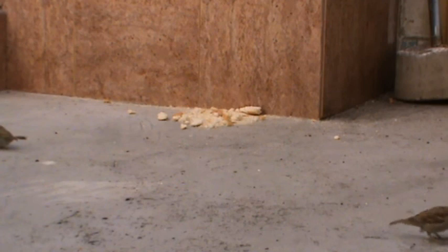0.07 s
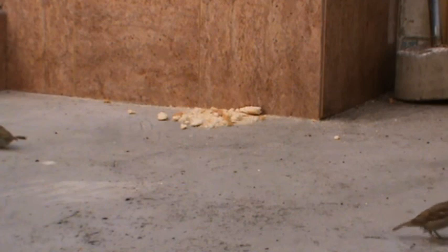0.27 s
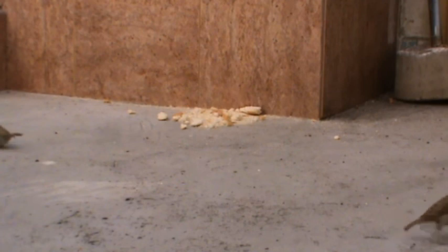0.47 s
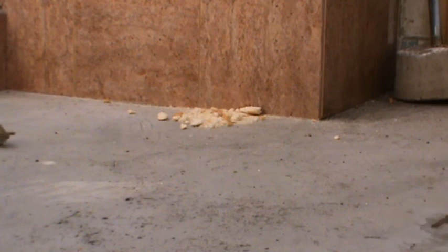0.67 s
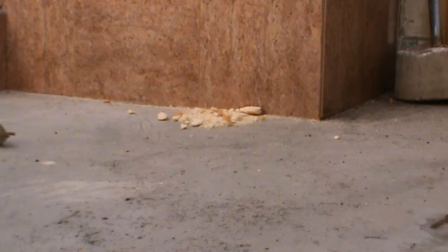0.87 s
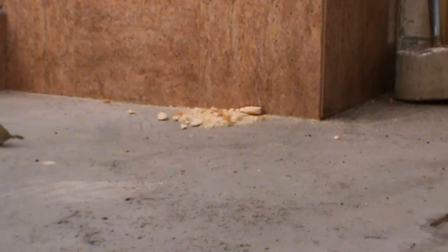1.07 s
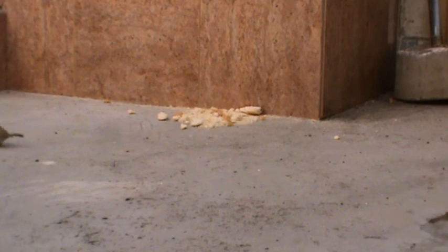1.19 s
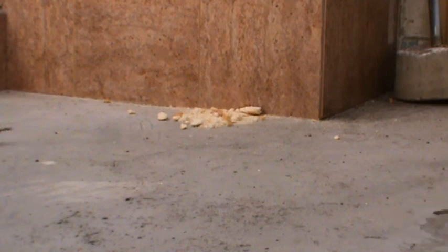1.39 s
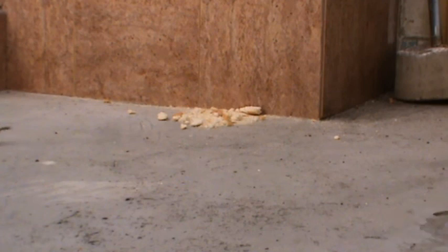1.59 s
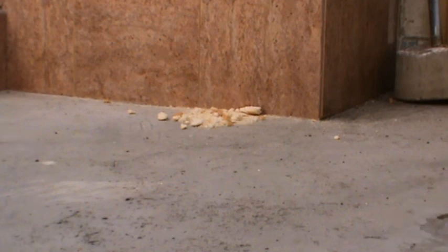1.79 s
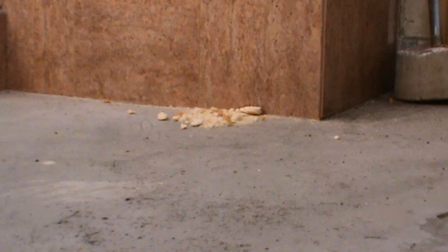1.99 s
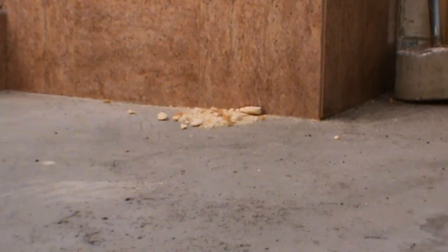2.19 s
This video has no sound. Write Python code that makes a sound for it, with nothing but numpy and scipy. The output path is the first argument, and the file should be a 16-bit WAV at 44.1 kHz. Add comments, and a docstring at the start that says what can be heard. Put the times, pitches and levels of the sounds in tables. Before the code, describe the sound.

Sparrows chirp on a walled patio, slightly left, with a brief echo. Two short rough notes open, then a loud, warbling cheep falls in pitch from 0.2 to 0.3 seconds. Faint foot scuffs and beak ticks follow around 0.5. Four quick raspy chirps run from 1.0 to 1.35, then a sharper peck on concrete at 1.5 with light shuffling. Faint distant rumble and hiss continue underneath until just past 2 seconds.

```python
"""Sparrows on a walled patio

One sparrow gives runs of short, rough chatter notes; another whistles a loud falling cheep.
Beaks tap and feet shuffle on the concrete floor, and the hard walls ring briefly.
A bed of distant rumble and microphone hiss lies underneath."""
import sys
import numpy as np
from scipy import signal
from scipy.fft import rfft, irfft
from scipy.io import wavfile

SR = 44100
rng = np.random.default_rng(int(sys.argv[2]) if len(sys.argv) > 2 else 0)


def master(y):
    """Save y as 16-bit WAV."""
    cut = np.clip(np.atleast_2d(y).T, -1, 1)
    pcm = np.round(cut * 32767)  # scale
    wavfile.write(sys.argv[1], SR, pcm.astype(np.int16))


N = 99225


def amp(db):
    return 10 ** (np.asarray(db) / 20)


def unit_rms(x):
    return x / np.sqrt(np.mean(x ** 2) + 1e-20)


def at_hz(curve, hz):
    """Read a curve along a log-frequency axis."""
    curve_hz, values = np.transpose(curve)
    return np.interp(np.log(hz), np.log(curve_hz), values)


def bandpass(x, low_hz, high_hz):
    sos = signal.butter(2, [low_hz, min(high_hz, SR / 2.2)], "band", fs=SR, output="sos")
    return signal.sosfilt(sos, x)


def drift(rate_hz, size):
    """Smooth random modulator, rms 1."""
    pole = np.exp(-2 * np.pi * rate_hz / SR)
    smooth = signal.lfilter([1], [1, -2 * pole, pole * pole], rng.standard_normal(size + SR))
    return unit_rms(smooth[SR:])


def coloured_noise(eq, size):
    """Noise through an EQ curve, rms 1."""
    white = rfft(rng.standard_normal(size))
    hz = np.arange(1, len(white) + 1) * SR / size
    return unit_rms(irfft(white * amp(at_hz(eq, hz)), size))


# Tone of the bed: (frequency [Hz], relative density [dB])
BED_EQ = [(20, -16), (32, -4), (49, 2.5), (62, -21.5), (90, -7.5), (125, -16), (152, -12), (220, -20),
          (460, -23), (1000, -25), (2000, -29.5), (4500, -35.5), (9000, -40), (12500, -38.5), (15300, -41)]
# Stereo width of the bed: (frequency [Hz], side minus mid [dB])
BED_WIDTH = [(60, -39), (110, -27.5), (200, -15.5), (380, -7), (690, -5), (1280, -1.5), (2360, -2.5),
             (4360, -4), (8040, -2.5), (14800, -24)]
# Fader ride on the rumble: (time [s], relative level [dB])
RUMBLE_RIDE = [(0.0, -61), (0.4, -62), (0.42, -55), (0.85, -62), (2.17, -56), (2.25, -56.5)]


def rumble_and_hiss(level_db=-53.5, crossover_hz=60):
    """A noise bed: distant rumble swells slowly under steady, wider microphone hiss."""
    hz = np.arange(1, N // 2 + 2) * SR / N
    low_cut_db = -200 * (hz < 15)
    mid, side = rfft(rng.standard_normal((2, N))) * amp(at_hz(BED_EQ, hz) + low_cut_db)
    stereo = mid + amp(at_hz(BED_WIDTH, hz)) * side * [[1], [-1]]
    times, ride_db = np.transpose(RUMBLE_RIDE)
    swell = amp(np.interp(np.arange(N) / SR, times, ride_db - ride_db.mean()))
    rumble = swell * irfft(stereo * (hz < crossover_hz), N)
    hiss = irfft(stereo * (hz >= crossover_hz), N)
    return amp(level_db) * unit_rms(rumble + hiss)


# Reverb decay: (frequency [Hz], time to fall 60 dB [s])
WALL_DECAY = [(500, 0.26), (2000, 0.37), (4000, .3), (8000, 0.24), (14000, 0.05)]
# Reverb tone: (frequency [Hz], gain [dB])
WALL_EQ = [(500, 5.2), (2000, 5.1), (4000, -1.1), (8000, 2.5), (14000, 7)]


def wall_reverb(send, return_db=1.5, predelay_s=.0013, side_db=-10):
    """Echoes off hard walls: a short stereo noise tail that dies away band by band."""
    age = np.arange(SR // 2) / SR
    edges_hz = 150 * 2 ** np.arange(0, 7.1, .5)
    white = rng.standard_normal((2, 2, len(age)))
    tail = np.zeros((2, len(age)))
    for k, (low, high) in enumerate(zip(edges_hz, edges_hz[1:])):
        centre = np.sqrt(low * high)
        decay = amp(at_hz(WALL_EQ, centre) - 60 * age / at_hz(WALL_DECAY, centre))
        tail += bandpass(white[k % 2], low, high) * decay
    impulse = tail * (age > predelay_s) / np.sqrt(SR / 50)
    mid, side = signal.fftconvolve(send[None], impulse, axes=1)[:, :len(send)]
    return amp(return_db) * (mid + amp(side_db) * side * [[1], [-1]])


# Foot scuffs: (start [s], length [s], level [dB], low cut [Hz], high cut [Hz])
SCUFFS = [(.3, 0.32, -69.5, 430, 650), (0.44, 0.061, -62.5, 310, 5000), (0.489, .13, -62, 300.5, 1470),
          (0.522, 0.094, -65.5, 3000, 13600), (0.834, .05, -69, 4060, 5240), (1.02, 0.052, -59, 810, 2980),
          (1.363, 0.029, -54.5, 252, 580), (1.335, 0.044, -58.5, 990, 1540), (1.497, 0.033, -55, 307, 1210),
          (1.607, 0.036, -61, 1290, 2250), (1.61, 0.057, -59.5, 2500, 5650)]


def foot_shuffles(t, grains_per_s=6000):
    """Feet scuff the concrete: dense uneven grains with a quick swell and a slower fade."""
    grains = rng.standard_normal(len(t)) * rng.exponential(1, len(t))
    grains *= rng.random(len(t)) < grains_per_s / SR
    out = np.zeros(len(t))
    for start, length, db, low_hz, high_hz in SCUFFS:
        progress = np.clip((t - start) / length, 0, 1)
        envelope = np.sin(np.pi * progress ** .53)
        out += amp(db) * envelope * unit_rms(bandpass(grains, low_hz, high_hz))
    return out


# Beak hits: (time [s], click level before filtering [dB], ring [Hz])
BEAK_HITS = [(0.527, -37.5, 4440), (.54, -46, 6370), (.838, -49, 4900), (1.4961, -34.5, 5850),
             (1.4975, -32.5, 3870), (1.503, -24.5, 3280), (1.513, -47, 3400)]


def beak_taps(t, ring_spread=1.15, knock_hz=1400, ring_gain=8, knock_gain=1.589):
    """A beak strikes the floor: a click excites a narrow ring and a broader, duller knock."""
    out = np.zeros(len(t))
    for time, db, ring_hz in BEAK_HITS:
        click = 1e-18 + amp(db) * (np.arange(len(t)) == np.searchsorted(t, time))
        out += ring_gain * bandpass(click, ring_hz / ring_spread, ring_hz * ring_spread)
        out += knock_gain * bandpass(click, knock_hz / 2, knock_hz * 2)
    return out


# Chatter notes: (start [s], gain [dB], length [s], top pitch [Hz], tilt [dB/octave])
CHATTER_NOTES = [(-.035, -35.5, 0.041, 2148, 0.1), (0.069, -34, 0.039, 2050, 0.1),
                 (1.013, -43.5, .025, 1878, -3), (1.096, -30, 0.043, 2150, 1.5),
                 (1.204, -26, 0.031, 2188, 2.5), (1.302, -29, 0.038, 2300, 1.8)]
# Throat resonances: (frequency [Hz], gain [dB])
THROAT_EQ = [(800, -34.5), (1300, -21), (2100, -21.5), (2900, -11), (3400, -10.5), (3750, -4), (4200, -3.5),
             (5000, -7.5), (6500, -18), (8000, -31), (11500, -33.5), (15000, -53.5)]
# Harmonics ahead of the throat, fundamental first: (level [dB])
CHATTER_HARMONICS = [7, 5, -6, -7, -5, -5]


def sparrow_chatter(t, attack_s=.018, release_s=.003, tilt_pivot_hz=3800):
    """Each note starts as throat rasp; part way, an unsteady voice glides up as the rasp fades."""
    glide_from, jitter = .52, .013  # shares of the pitch
    voice_entry, crossfade = .52, .08  # shares of the note
    voice_shimmer_db, rasp_shimmer_db, rasp_db, end_fade_db = 3, 2, -4, -5.5
    out = np.zeros(len(t))
    wobble = 1 + jitter * drift(300, len(t))
    shimmers = np.array([drift(450, len(t)) for _ in range(4)])
    for start, db, length, top_hz, tilt in CHATTER_NOTES:
        throat = [(hz, gain + tilt * np.log2(hz / tilt_pivot_hz)) for hz, gain in THROAT_EQ]
        on = (t > start) & (t < start + length + 8 * release_s)
        age, shimmer = t[on] - start, shimmers[:, on]
        progress = np.minimum(age / length, 1)
        pitch_hz = top_hz * (glide_from + (1 - glide_from) * progress)
        phase = 2 * np.pi * np.cumsum(pitch_hz * wobble[on]) / SR
        voice = np.zeros(len(age))
        for k, harmonic_db in enumerate(CHATTER_HARMONICS, 1):
            shaped_db = harmonic_db + at_hz(throat, k * pitch_hz)
            voice += amp(shaped_db + voice_shimmer_db * shimmer[k % 3]) * np.sin(k * phase)
        rasp = amp(rasp_db + rasp_shimmer_db * shimmer[3]) * coloured_noise(throat, len(age))
        voicing = 1 / (1 + np.exp((voice_entry - progress) / crossfade))
        attack = np.minimum(age / attack_s, 1)
        release = np.exp(-np.maximum(age - length, 0) / release_s)
        envelope = attack * release * amp(db + end_fade_db * progress ** 3)
        out[on] += envelope * (voicing * voice + (1 - .75 * voicing) * rasp)
    return out


# Cheep contour, with a quiet raspy lead-in: (time [s], pitch [Hz], whistle [dB], rasp [dB])
CHEEP_CONTOUR = [(0.168, 4150, -65.5, -52.5), (0.189, 4260, -38.5, -47), (.203, 4170, -43.5, -33),
                 (0.209, 3700, -43, -44.5), (0.214, 3730, -22.5, -40), (.219, 3855, -18, -51.5),
                 (.228, 4193, -22, -40.5), (0.237, 3706, -26.5, -49), (.244, 3905, -19, -46),
                 (0.255, 3450, -26, -40), (.272, 3155, -27.5, -49), (0.286, 2713, -28, -42.5),
                 (0.306, 2528, -48, -52.5), (0.318, 2270, -51.5, -62), (.33, 2200, -60, -70)]
# Whistle harmonics, fundamental first: (relative level [dB])
CHEEP_HARMONICS = [0, -25, -28, -36]
# Tone of the rasp: (frequency [Hz], relative density [dB])
CHEEP_RASP_EQ = [(1800, -28), (3000, -14), (4600, -4), (5400, 0), (6800, -9), (8000, -18), (9700, -27),
                 (12500, -22), (15000, -34)]


def sparrow_cheep(t, warble_start_s=.23, warble_hz=89.55, vibrato_hz=179.6, tremolo_db=2.5):
    """A near-pure whistle starts clean, then warbles unevenly as it falls; bright rasp rides on it."""
    times, contour_hz, whistle_db, rasp_db = np.transpose(CHEEP_CONTOUR)
    warble = np.sin(2 * np.pi * warble_hz * (t - warble_start_s)) + .5 * drift(150, len(t))
    warble *= t > warble_start_s
    pitch_hz = np.interp(t, times, contour_hz) + vibrato_hz * warble
    phase = 2 * np.pi * np.cumsum(pitch_hz) / SR
    whistle = np.zeros(len(t))
    for k, harmonic_db in enumerate(CHEEP_HARMONICS, 1):
        flicker_db = 2.5 * (k > 1) * drift(120, len(t))  # overtones only
        whistle += amp(harmonic_db + flicker_db) * np.sin(k * phase)
    whistle *= amp(np.interp(t, times, whistle_db) + tremolo_db * warble)
    rasp = amp(np.interp(t, times, rasp_db)) * coloured_noise(CHEEP_RASP_EQ, len(t))
    gate = (t > times[0]) & (t < times[-1])
    return (whistle + rasp) * gate


def scene(chatter_pan_db=2.3, cheep_pan_db=3, floor_send_db=-2.5):
    """Mix both birds a little left and the floor sounds centred, over the reverb and the bed."""
    t = np.arange(-SR // 10, N) / SR  # 0.1 s of pre-roll
    chatter, cheep = sparrow_chatter(t), sparrow_cheep(t)
    floor = beak_taps(t) + foot_shuffles(t)
    leftward = np.array([[.5], [-.5]])
    direct = chatter * amp(chatter_pan_db * leftward) + cheep * amp(cheep_pan_db * leftward) + floor
    send = chatter + cheep + amp(floor_send_db) * floor  # the floor sounds are nearer, so drier
    return (direct + wall_reverb(send))[:, -N:] + rumble_and_hiss()


def record(dry, cutoff_hz=15400):
    """A steep high cut on the master."""
    return signal.sosfilt(signal.ellip(12, .5, 65, cutoff_hz, fs=SR, output="sos"), dry)


dry = scene()
out = record(dry)
master(out)
```